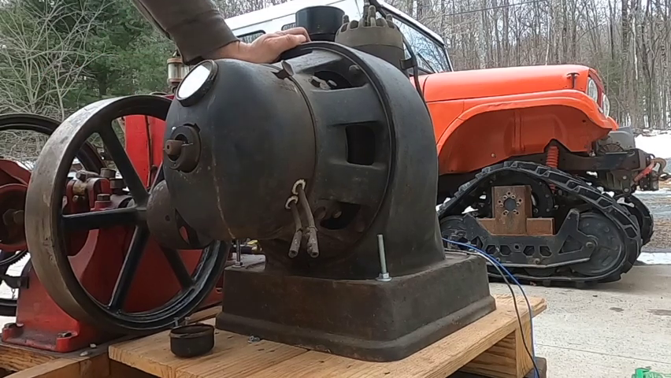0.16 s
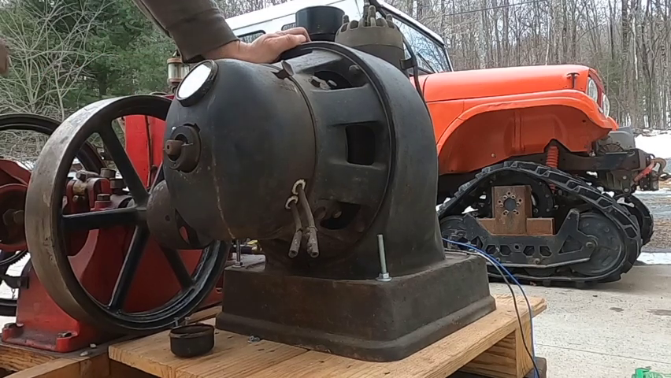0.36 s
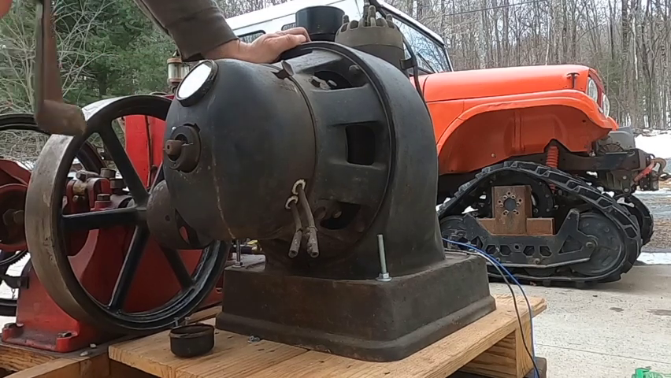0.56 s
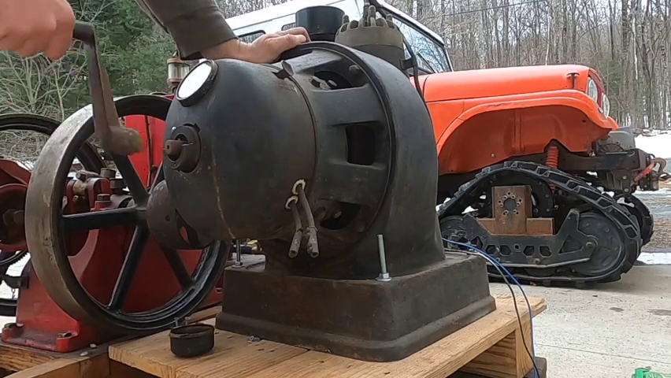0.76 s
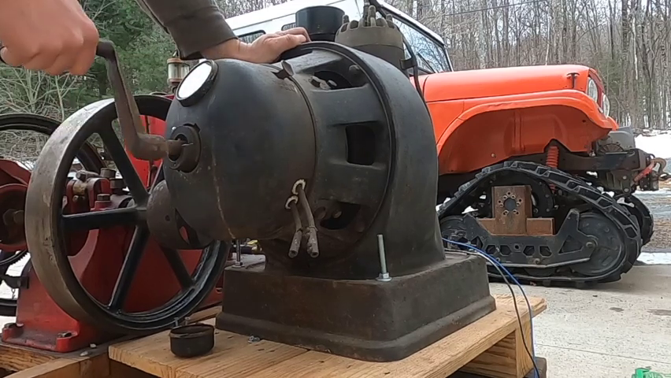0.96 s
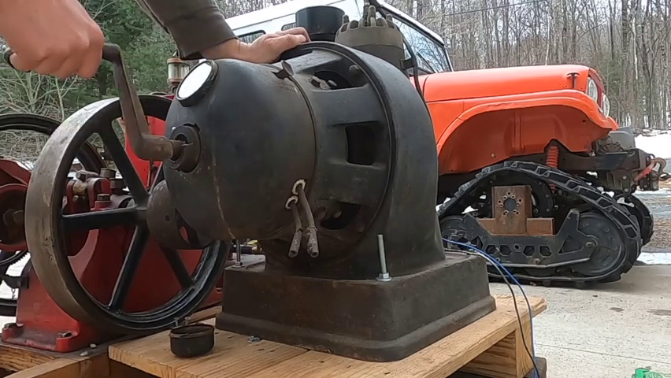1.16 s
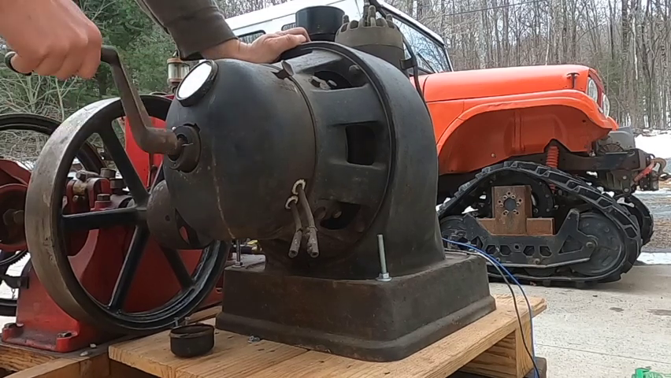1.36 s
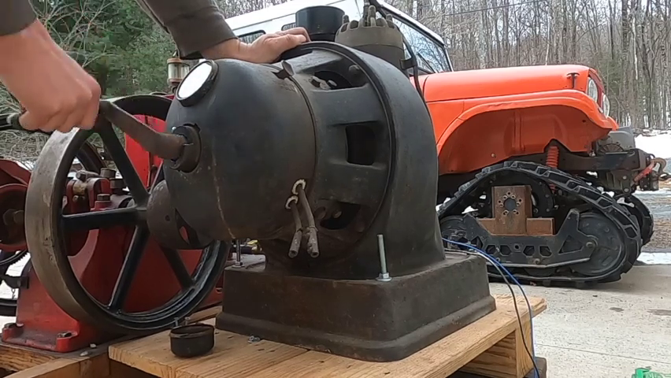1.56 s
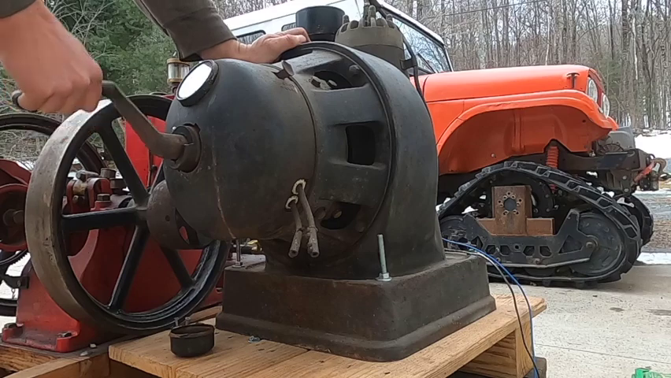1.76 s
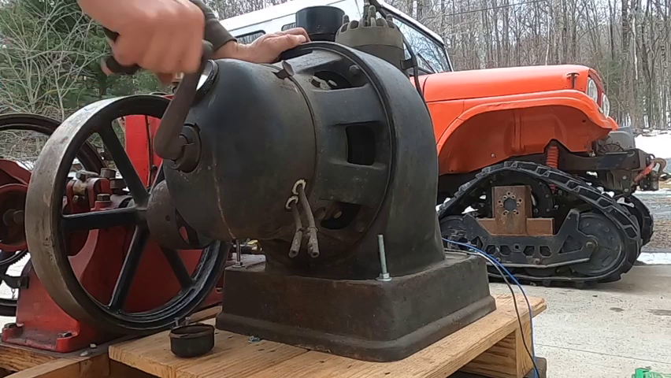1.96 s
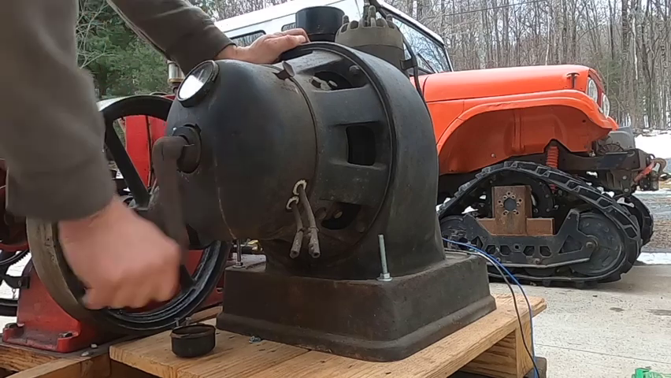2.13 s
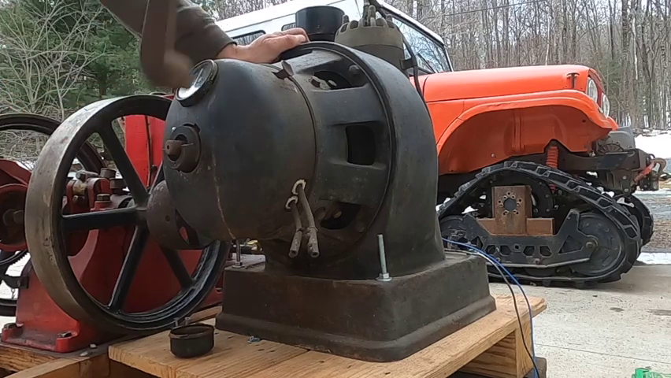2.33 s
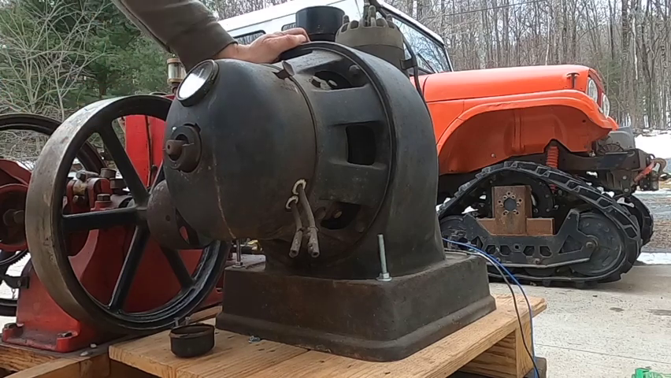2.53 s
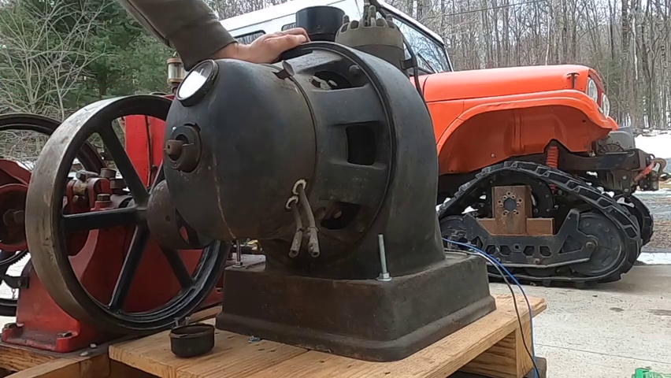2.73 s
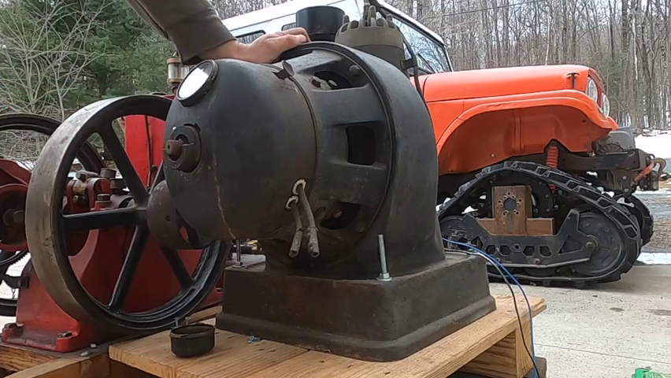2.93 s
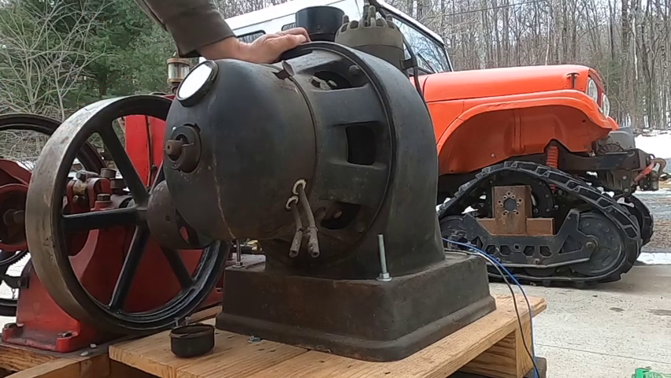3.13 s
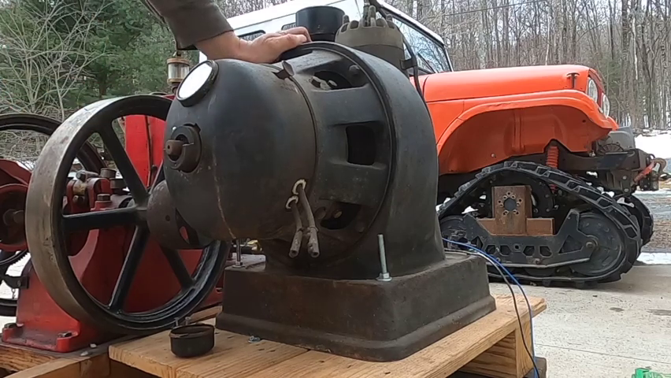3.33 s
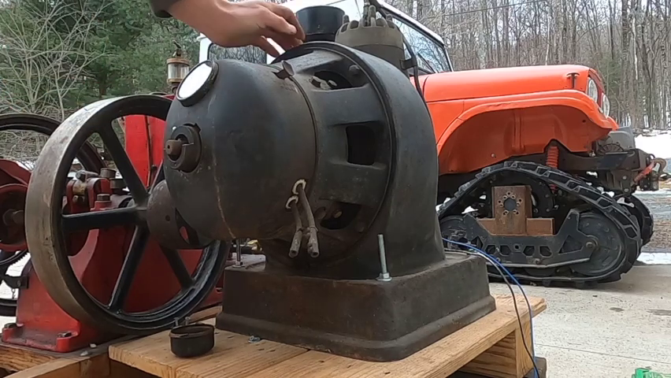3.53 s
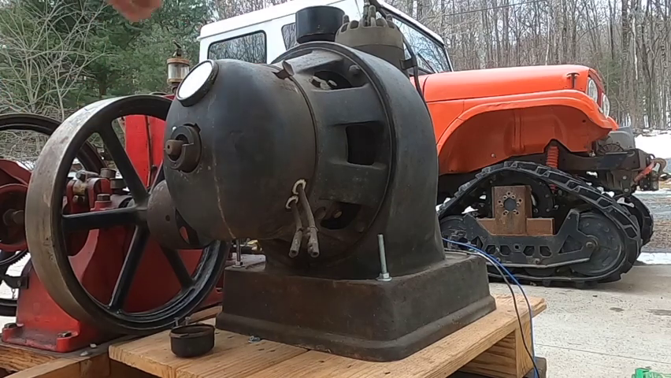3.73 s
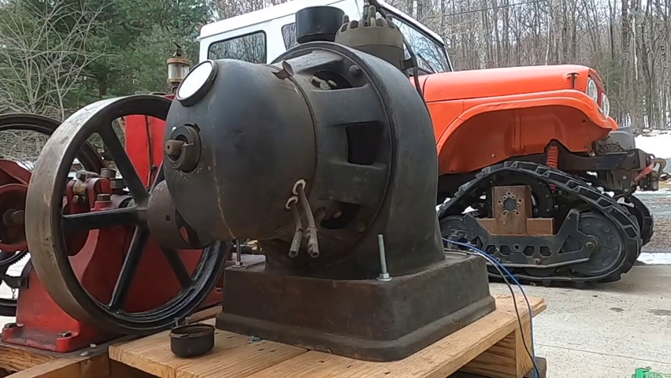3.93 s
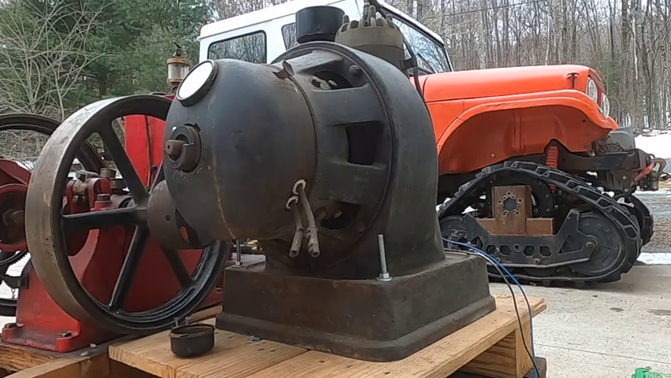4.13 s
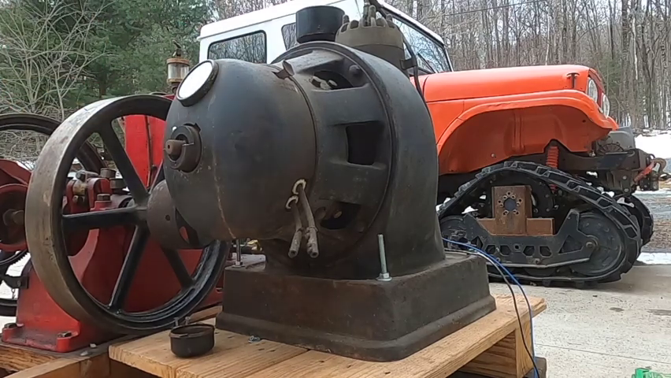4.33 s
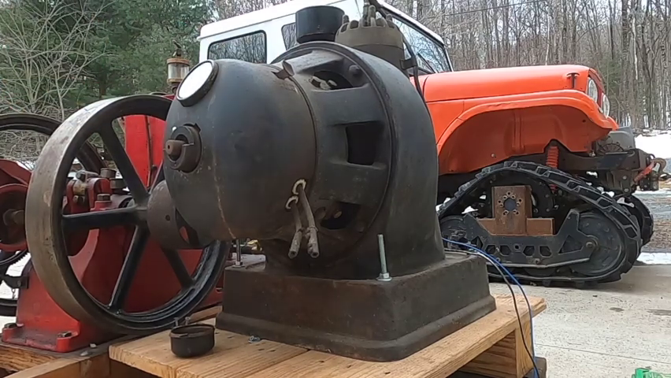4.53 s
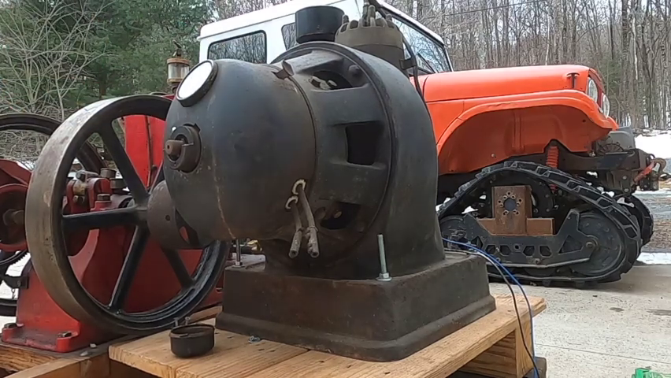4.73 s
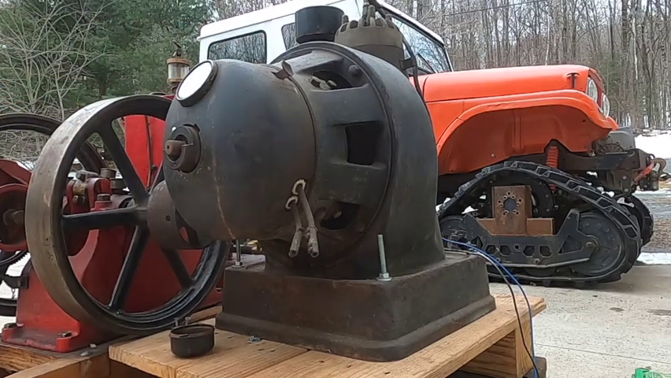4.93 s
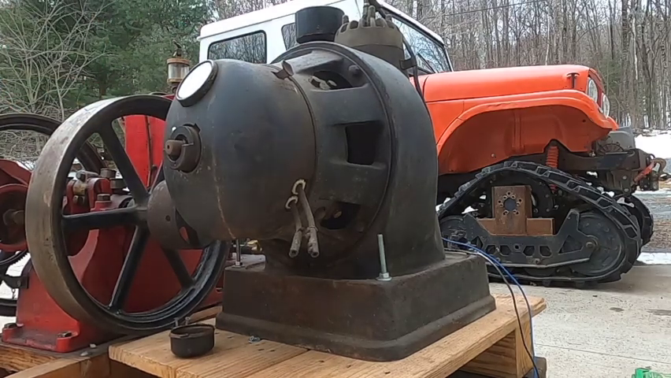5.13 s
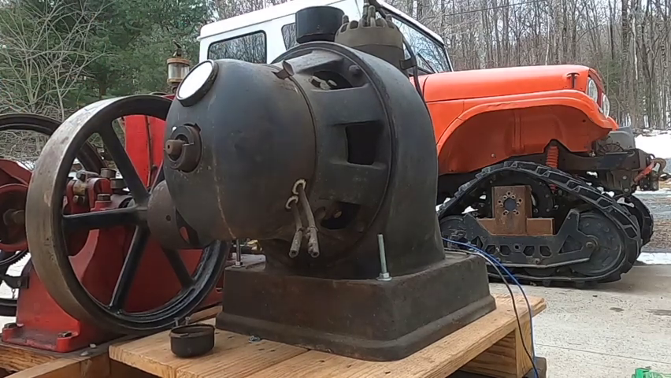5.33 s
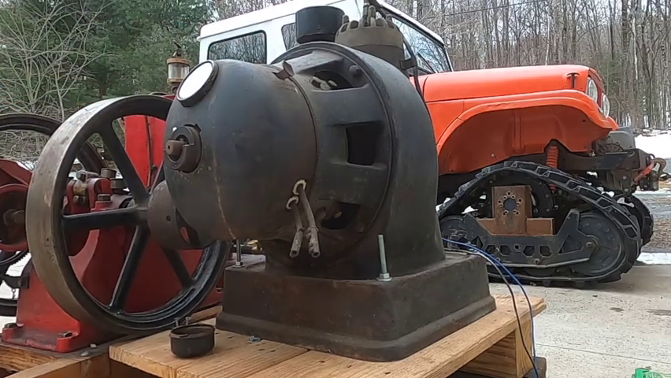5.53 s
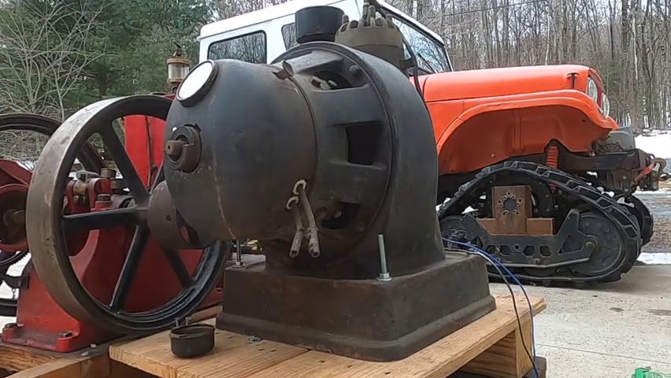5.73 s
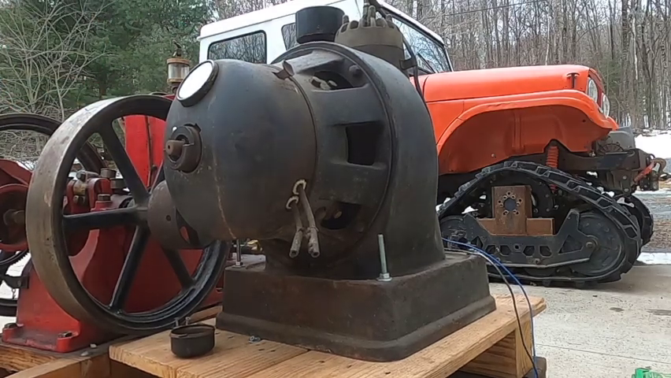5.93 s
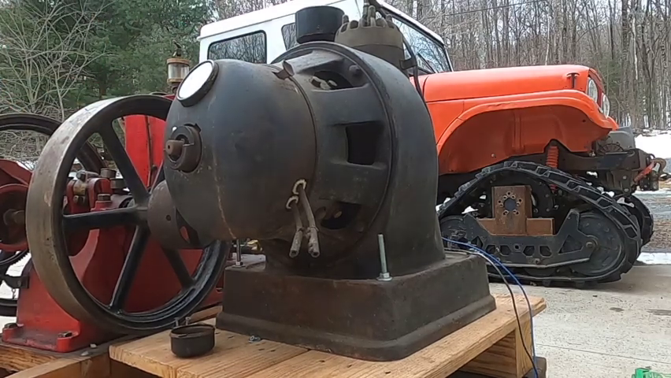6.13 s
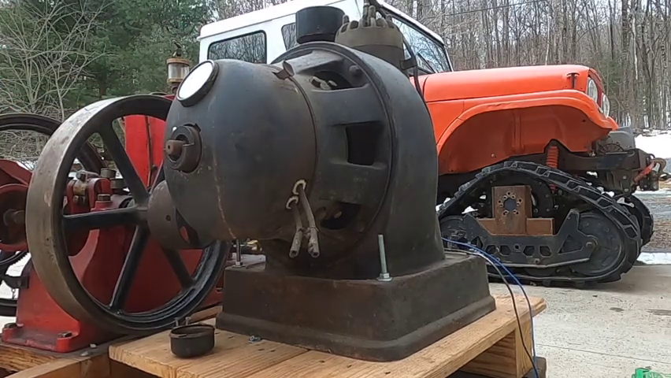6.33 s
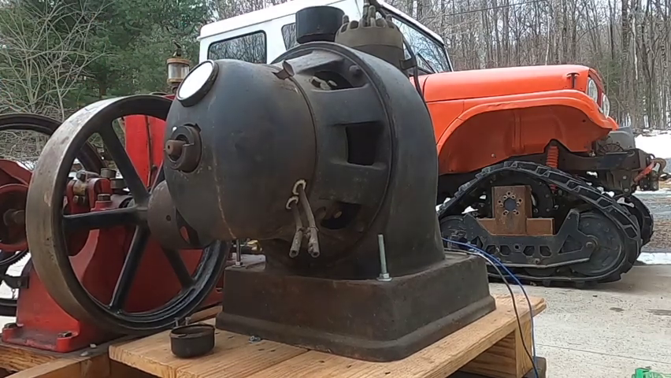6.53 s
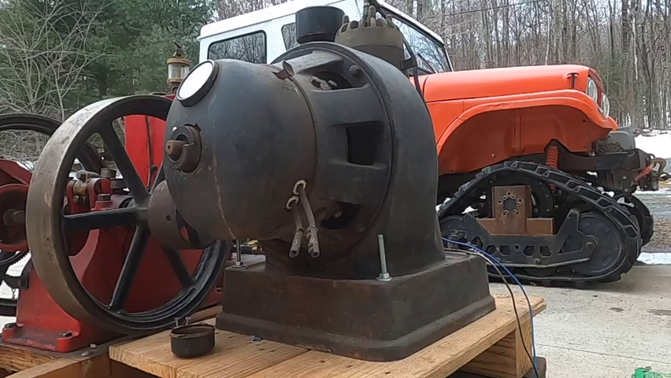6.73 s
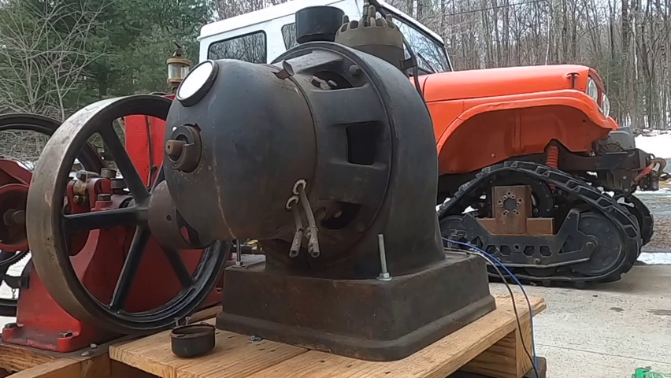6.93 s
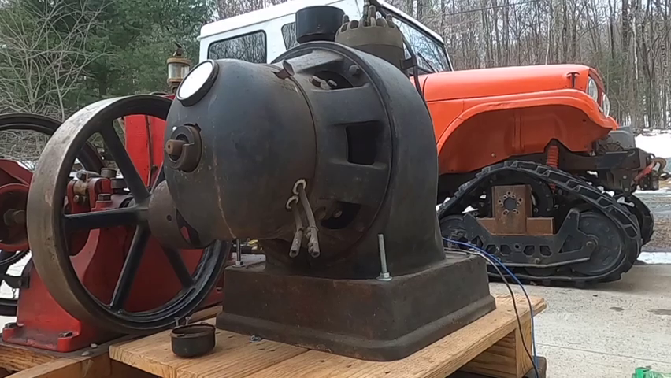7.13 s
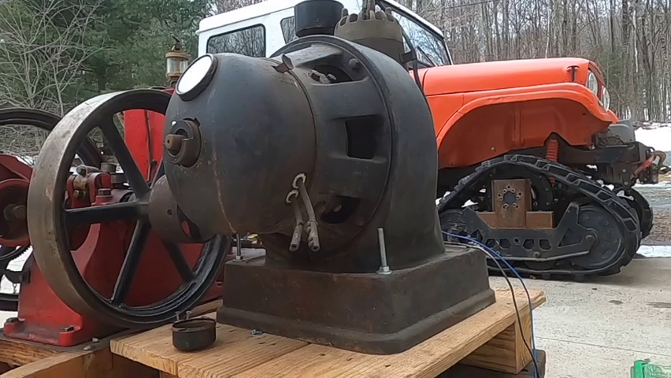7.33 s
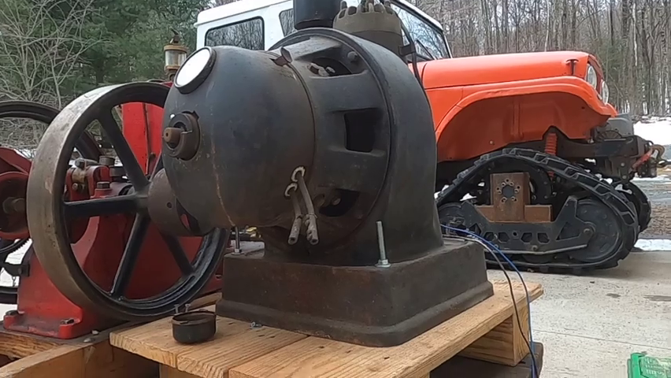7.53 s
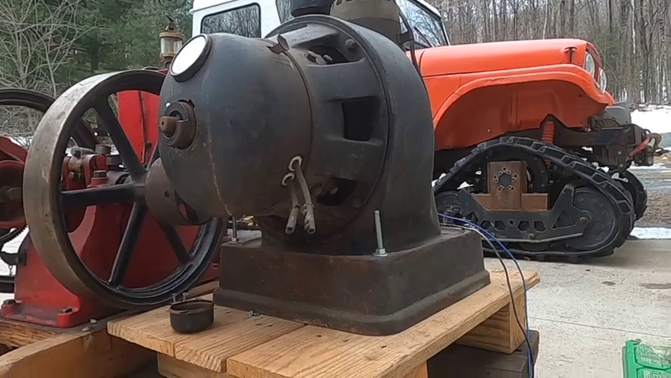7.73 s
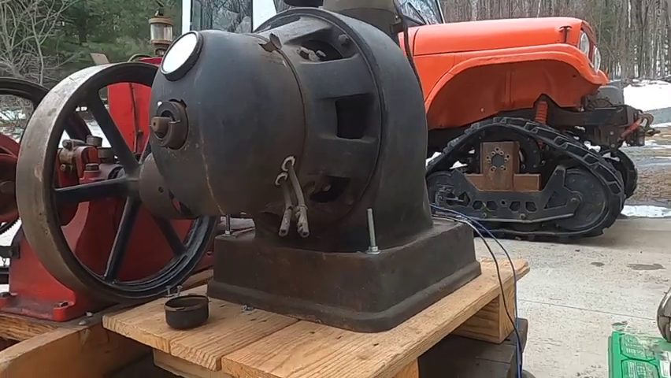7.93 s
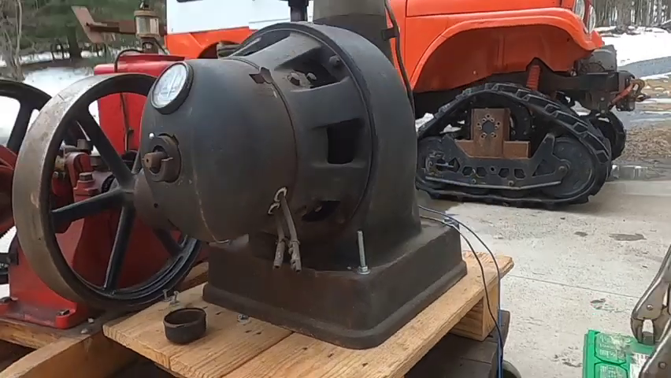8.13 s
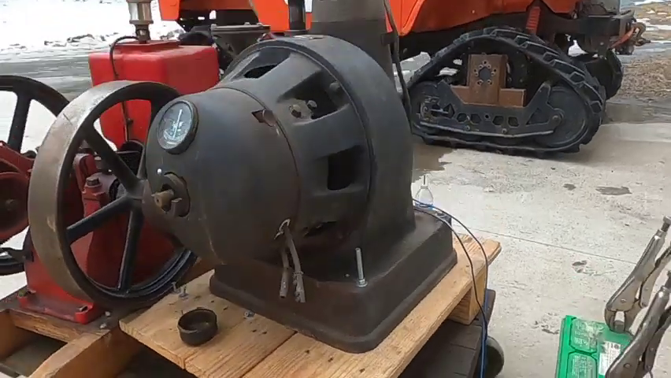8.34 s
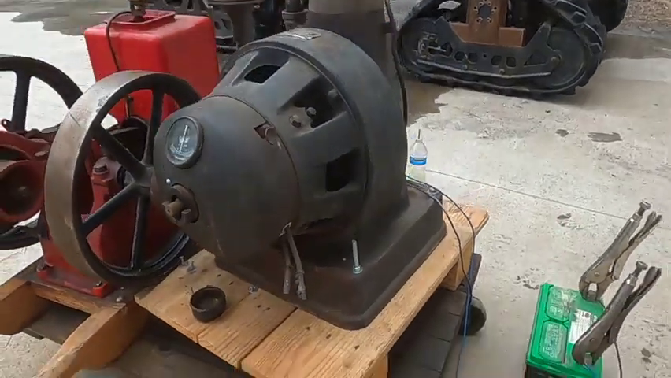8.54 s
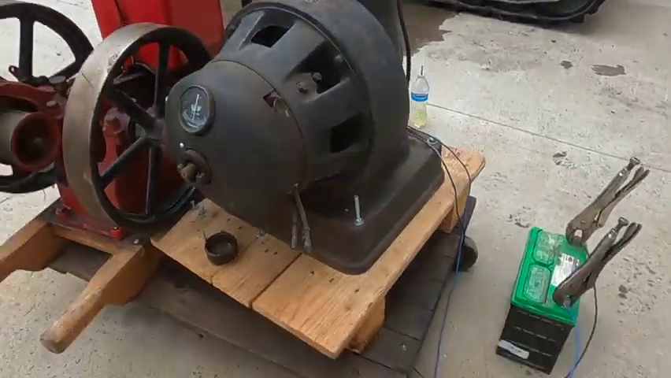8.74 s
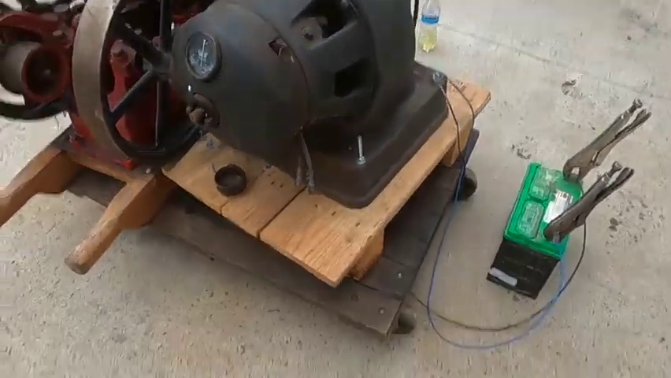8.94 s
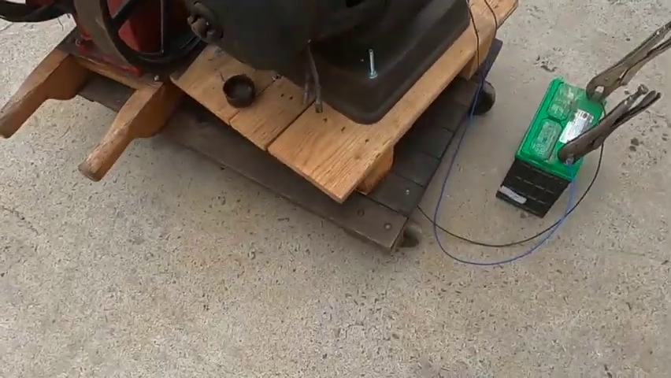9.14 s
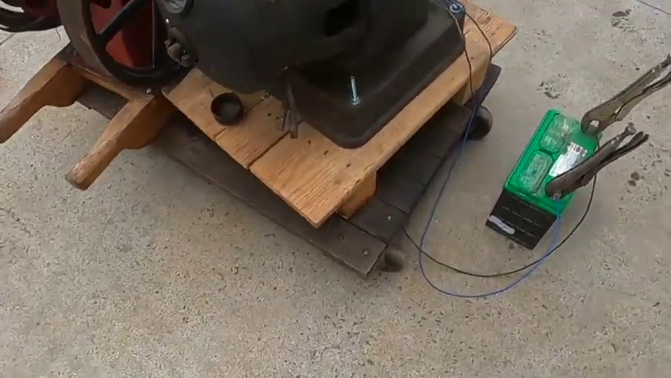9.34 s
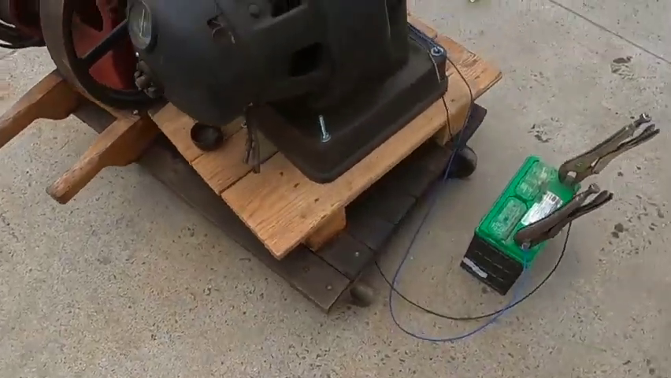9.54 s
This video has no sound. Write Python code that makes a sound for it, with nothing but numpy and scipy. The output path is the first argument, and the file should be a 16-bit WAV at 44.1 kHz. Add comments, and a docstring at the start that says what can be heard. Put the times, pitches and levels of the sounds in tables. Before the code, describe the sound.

Close by and outdoors, a small antique engine gives slow puffs and light knocks while a metal hand crank rattles into place. After one sharp clank, the exhaust starts to thump and crack, the beats coming ever quicker. Loose iron parts chatter as the engine runs up to a rapid, even beat, and right at the end it begins to fire only on every other turn.

```python
"""An old single-cylinder two-stroke generator engine, hand-cranked in a paved yard.
It rocks to a stop, the steel crank handle clanks back on, a swing makes it catch,
and it runs up until it fires only every other turn. Each turn brings a piston slap,
a crankcase gulp, a knock, an intake thump and the exhaust's thump and crack.
Blows ring damped modes; gas jets and rubbing are shaped noise."""
import sys
import numpy as np
from scipy import signal
from scipy.fft import rfft, irfft, next_fast_len
from scipy.io import wavfile
from scipy.ndimage import uniform_filter1d

SR = 44100
rng = np.random.default_rng(int(sys.argv[2]) if len(sys.argv) > 2 else 0)


def persist_wave(psi):
    """Save psi, clipped to +-1, as 16-bit WAV."""
    counts = np.round(np.clip(psi, -1, 1) * 32767).astype(np.int16)
    wavfile.write(sys.argv[1], SR, np.atleast_2d(counts).T)


N = 422478
TIME = np.arange(N) / SR
CAUGHT_S, SKIPPING_S = 3.5609, 9.14

# crank speed once caught: time_s, turns_per_s
SPEED = [(3.56, 6.573), (3.8, 6.655), (4.05, 7.772), (4.4, 9.641), (4.8, 12.32), (5.2, 15.356),
         (5.6, 18.685), (6.0, 21.579), (6.4, 24.098), (6.8, 26.034), (7.2, 27.816), (7.6, 29.43),
         (8.0, 30.59), (8.5, 31.567), (9.1, 32.633), (9.58, 32.605)]
# piston slap stroke: turns_before_exhaust, delay_s, level_db, db_per_speed_doubling, full_pull_db
SLAP_STROKE = (.52, 0, -31, -1.5, 1)
# piston rocking short of a full turn: start_s, slap_db
ROCKS = [(.562, -35), (.684, -44), (1.104, -39), (1.204, -42.5), (1.296, -43), (2.024, -41)]
# listener moving over the engine: time_s, left_lag_samples, crack_db, thump_db, shell_db
LISTENER = [(7.1, 1, 0, 0, -35), (7.7, 1, 0, 0, -16), (8.6, .2, 1.5, -3, -1)]
# rubbing and casting spectra: freq_hz, density_db
HISS_COLOUR = [(700, -42), (1400, 0), (2500, 0), (3300, -5), (4400, -7.5), (6000, -13.5), (8200, -14.5),
               (10000, -25), (14000, -35), (16000, -41)]
CASTING_COLOUR = [(100, -4), (250, 8), (600, 10.5), (900, 8.5), (1500, -7.5), (2600, -9.5), (5000, -17.5),
                  (9000, -48.5)]


def from_db(db):
    """Decibels to gain."""
    return 10 ** (np.asarray(db) / 20)


def at_time(rows, time_s):
    """Each value column of a curve at the given times."""
    knots_s, *columns = np.transpose(rows)
    return [np.interp(time_s, knots_s, c) for c in columns]


def noise(colour, size):
    """Unit-rms stereo noise, alike in both ears in the bass."""
    # left-right likeness: freq_hz, correlation
    likeness = [(100, 1), (1500, 1), (2500, .97), (5000, .78), (14000, .65)]
    log_hz = np.log(np.arange(size // 2 + 1) * SR / size + 1)
    curves = np.transpose(colour), np.transpose(likeness)
    level_db, alike = (np.interp(log_hz, np.log(hz), values) for hz, values in curves)
    mid, side = rfft(rng.standard_normal((2, size))) * from_db(level_db)
    x = irfft(np.sqrt(1 + alike) * mid + np.sqrt(1 - alike) * side * [[1], [-1]], size)
    return x / x.std()


def long_noise(colour):
    """Scene-length coloured noise."""
    return noise(colour, next_fast_len(N, True))[:, :N]


def grain(samples):
    """Unit-rms random flutter."""
    x = uniform_filter1d(rng.standard_normal(N), samples)
    return x / x.std()


def clicks(events, spread_db):
    """One impulse per event row: start_s, level_db."""
    start_s, level_db = np.transpose(events)
    gains = from_db(level_db + spread_db * rng.standard_normal(len(start_s)))
    return np.bincount(np.clip(start_s * SR, 0, N).astype(int), gains, N + 1)[:N] + 1e-18


def ring(events, modes, soft_hz, spread_db=0, swoop_cycles=0, alternate=False):
    """Blows ring modes; late low modes swoop down, alternating signs soften the onset."""
    start_s, blow_db = np.transpose(events)
    doublings, out = effort(start_s)[0], 0
    for k, (hz, level_db, t60_s, rise_db) in enumerate(modes):
        sign = -1 if alternate and k % 2 else 1
        r, w = from_db(-60 / (t60_s * SR)), 2 * np.pi * hz / SR
        late_s = swoop_cycles * (1 / hz - 1 / modes[-1][0])
        blows = clicks(np.c_[start_s + late_s, blow_db + level_db + rise_db * doublings], spread_db)
        out = out + sign * signal.lfilter([0, np.sin(w)], [1, -2 * r * np.cos(w), r * r], blows)
    return signal.sosfilt(signal.butter(2, soft_hz, fs=SR, output="sos"), out)


def bursts(events, rise_s, fall_s, spread_db=0):
    """Envelope that swells and dies at each event."""
    t = TIME[:SR // 4]
    shape = (1 - np.exp(-t / rise_s)) ** 2 * np.exp(-t / fall_s)
    return signal.oaconvolve(clicks(events, spread_db), shape / shape.max())[:N]


def bouncing(events, gap_s, loss_db, count=3):
    """Each event as a run of weakening strikes at uneven gaps."""
    gaps_s = gap_s * rng.uniform(.4, 1.6, (len(events), count))
    start_s = events[:, :1] + np.cumsum(gaps_s, axis=1) - gaps_s[:, :1]
    return np.c_[start_s.ravel(), (events[:, 1:] - loss_db * np.arange(count)).ravel()]


def radiate(x, low_hz):
    """Small openings and panels radiate little deep bass."""
    return signal.sosfilt(signal.butter(1, low_hz, "high", fs=SR, output="sos"), x)


def crank_turns():
    """Turns since the engine caught."""
    turns = np.cumsum(at_time(SPEED, TIME)[0]) / SR
    return turns - np.interp(CAUGHT_S, TIME, turns)


def effort(time_s):
    """Speed doublings since catching, and pull (share of full acceleration)."""
    window_s, full_turns_per_s2 = .4, 8
    before, now, after = (at_time(SPEED, time_s + d)[0] for d in (-window_s / 2, 0, window_s / 2))
    return np.log2(now / SPEED[0][1]), np.clip((after - before) / window_s / full_turns_per_s2, 0, 1)


def strokes(stroke):
    """One event per running turn; strength follows speed and pull."""
    lead_turn, delay_s, level_db, speed_db, pull_db = stroke
    turns = crank_turns()
    start_s = np.interp(np.arange(turns[-1] + lead_turn) - lead_turn, turns, TIME) + delay_s
    doublings, pull = effort(start_s)
    return np.c_[start_s, level_db + speed_db * doublings + pull_db * pull]


def slow_strokes(stroke, column):
    """One event per cranked turn; a slow crank lingers at dead centre, then hurries."""
    # cranked turns: dead_centre_s, port_opens_s, slap_db, gulp_db, intake_db, thump_db, crack_db
    slow_turns = [(-.095, .078, -60, -60, -16, -17.5, -26), (.208, .408, -30.5, -18, -19, -14, -28.5),
                  (.695, .895, -55, -50, -32, -16, -30), (2.1, 2.254, -55, -50, -17, -13.5, -22),
                  (2.352, 2.47, -35, -14, -9, -10, -13), (2.545, 2.662, -25.5, -10.5, -12, -16.5, -23),
                  (2.755, 2.854, -36, -14, -11, -10.5, -10), (2.935, 3.034, -25.5, -16, -14, -20.5, -26),
                  (3.133, 3.219, -36, -13.5, -10, -12.5, -13), (3.29, 3.395, -26.5, -14, -12, -19, -24)]
    columns = np.transpose(slow_turns)
    centre_s, port_s = columns[:2]
    share = (stroke[0] / SLAP_STROKE[0]) ** 1.6
    return np.c_[port_s - share * (port_s - centre_s) + (1 - share) * stroke[1], columns[column]]


def skip_firings(events, loss_db, boost_db):
    """At full speed every other turn fails to fire; the rest fire harder."""
    change_db = np.where(np.arange(len(events)) % 2 == 1, loss_db, boost_db)
    return events + np.outer((events[:, 0] > SKIPPING_S) * change_db, [0, 1])


def yard(x, wet_db, t60_s, onset_s):
    """Machines, paving and trees scatter a short tail."""
    # tail spectrum: freq_hz, density_db
    colour = [(40, -16), (200, 11.5), (1000, -5), (4000, -7), (9000, -8), (16000, -4.5)]
    t = TIME[:SR // 2]
    tail = noise(colour, len(t)) * from_db(-60 * t / t60_s) * (1 - np.exp(-(t / onset_s) ** 2))
    tail /= np.sqrt(np.sum(tail ** 2) / 2)
    return x + from_db(wet_db) * signal.oaconvolve(x, tail, axes=1)[:, :N]


def friction(swell_db, grain_db, shake_db):
    """Rubbing and air grow with speed and swell once a turn; the unbalanced crank shakes the frame."""
    # rubbing while cranking: time_s, level_db
    rubbing = [(0.0, -60), (0.44, -62), (0.7, -75), (.88, -63), (1.25, -77), (1.49, -57), (1.72, -77),
               (1.97, -70), (2.45, -48), (2.98, -58), (3.5, -56)]
    # rumble spectrum: freq_hz, density_db
    rumble_colour = [(30, 4), (90, 5), (250, 7.5), (450, 1.5), (700, -4), (1050, -3.5), (1600, -18.5),
                     (3000, -45.5)]
    rubbing_db, doublings = at_time(rubbing, TIME)[0], effort(TIME)[0]
    angle, running = 2 * np.pi * crank_turns(), TIME > CAUGHT_S
    swell = from_db(swell_db * running * np.cos(angle + 2 * np.pi * .053))
    hiss_db = rubbing_db + 1.5 + 8.2 * doublings + grain_db * running * grain(samples=180)
    hiss = from_db(hiss_db) * long_noise(HISS_COLOUR)
    rumble = from_db(rubbing_db + 14 + 5.8 * doublings) * long_noise(rumble_colour)
    frame = from_db(shake_db) * running * (at_time(SPEED, TIME)[0] / SPEED[-1][1]) ** 2 * np.cos(angle)
    return swell * (hiss + rumble) + frame


def crank_handle(ring_db, scrape_db, casting_db, shaft_db):
    """Steel meets the shaft: handle, socket and shaft ring, the contact scrapes, the casting thuds."""
    # handle hits: start_s, handle_db, socket_db, scrape_db, shaft_and_casting_db
    clanks = [(1.097, -26, -36, -37, -27.5), (1.323, -34, -26, -25, -35), (1.337, -33, -22, -28, -48),
              (1.475, -39, -36, -34, -32.5), (1.491, -28, -31, -29, -43), (1.501, -27, -30, -30, -41),
              (1.515, -36, -26, -12, -18), (2.346, -12, -30, -25, -26)]
    # steel modes: pitch_hz, level_db, t60_s, db_per_speed_doubling
    handle_modes = [(1035, -2, .1, 0), (1346, 3, .075, 0), (1415, 0, .09, 0), (3018, -1.5, .16, 0),
                    (7639, -17, .16, 0), (8565, -15, .14, 0)]
    socket_modes = [(1367, -6, .1, 0), (1900, -5, .1, 0), (2083, -3, .11, 0), (2557, -3, .13, 0),
                    (3060, 2, .08, 0), (3540, -2, .06, 0), (4538, -8, .12, 0), (7590, -8, .13, 0),
                    (9100, -22, .17, 0)]
    shaft_modes = [(587, -4, .2, 0), (807, -5, .2, 0), (1750, -6, .14, 0), (2213, 0, .11, 0),
                   (3849, -10, .12, 0)]
    # handle rubbing on the spinning shaft until drawn off: time_s, level_db
    spinning = [(1.9, -80), (2.2, -58), (2.5, -57), (2.68, -52), (2.8, -75)]
    # its spectrum: freq_hz, density_db
    spin_colour = [(1500, -20), (3000, -4), (4200, 0), (7500, -5), (10000, -19), (13000, -17), (16000, -35)]
    handle_hits, socket_hits, contacts, shaft_hits = (np.array(clanks)[:, [0, k]] for k in (1, 2, 3, 4))
    steel = ring(handle_hits, handle_modes, soft_hz=12000, spread_db=1, swoop_cycles=2.3)
    steel += ring(socket_hits, socket_modes, soft_hz=12000, spread_db=1, swoop_cycles=2)
    shaft = ring(shaft_hits, shaft_modes, soft_hz=9000, spread_db=1, swoop_cycles=2)
    skids = bouncing(contacts, gap_s=.007, loss_db=6)
    scrape = bursts(skids, rise_s=.00018, fall_s=.007, spread_db=1.2) * long_noise(HISS_COLOUR)
    casting = bursts(shaft_hits, rise_s=.00033, fall_s=.022, spread_db=.6) * long_noise(CASTING_COLOUR)
    spin = from_db(at_time(spinning, TIME)[0] + 3 * grain(samples=60)) * long_noise(spin_colour)
    ringing = from_db(ring_db) * steel + from_db(shaft_db) * shaft
    return ringing + from_db(scrape_db) * scrape + from_db(casting_db) * casting + spin


def knocking(slap_db, knock_db, loose_db, grit_db):
    """Play in piston and bearings knocks on the iron; loose parts join in."""
    # iron modes: pitch_hz, level_db, t60_s, db_per_speed_doubling
    slap_modes = [(573, 7, .045, 0), (676, 5.5, .02, 0), (870, -2, .04, 0), (1062, 1, .06, 0)]
    knock_modes = [(346, -3, 0.069, 0), (400.2, 6, 0.14, 0), (451, -3, 0.082, 0.24), (544, 2, 0.073, 0),
                   (615, -0.5, 0.07, 0), (807, -4, 0.063, 1.4)]
    loose_modes = [(735, -4, .04, 0), (950, -4, .036, 0), (1070, 0, .045, 0), (1172, -4, .06, 0),
                   (1385, -3.5, .041, 0)]
    # strokes: turns_before_exhaust, delay_s, level_db, db_per_speed_doubling, full_pull_db
    knock_stroke = (.39, 0, -21.3, -2.6, 2.5)
    chatter_stroke = (.29, 0, -31, 4.6, 2.5)
    slaps = np.r_[ROCKS, slow_strokes(SLAP_STROKE, column=2), strokes(SLAP_STROKE)]
    knocks = np.r_[slow_strokes(knock_stroke, column=4) - [0, 8.5], strokes(knock_stroke)]
    # a loose part bounces as the engine passes its resonance
    rattles = np.c_[4.853 + .069 * np.arange(9), np.full(9, -17)]
    jolts = np.r_[strokes(chatter_stroke), knocks - [0, 11], slaps - [0, 7]]
    shaken = bouncing(jolts, gap_s=.005, loss_db=3.5)
    slap = ring(slaps, slap_modes, soft_hz=1850, spread_db=1, swoop_cycles=4.95)
    knock = ring(knocks, knock_modes, soft_hz=1080, spread_db=.5, swoop_cycles=5.5)
    loose = ring(np.r_[rattles, shaken], loose_modes, soft_hz=3000, spread_db=1.2, swoop_cycles=4.24)
    grit = bursts(np.r_[slaps, rattles, knocks - [0, 7]], rise_s=.00077, fall_s=.012, spread_db=.5)
    iron = from_db(slap_db) * slap + from_db(knock_db) * knock + from_db(loose_db) * loose
    return radiate(iron, low_hz=200) + from_db(grit_db) * grit * long_noise(CASTING_COLOUR)


def breathing_ports():
    """The crankcase gulps, then the intake opens: soft, hollow thumps of suction."""
    # cavity modes: pitch_hz, level_db, t60_s, db_per_speed_doubling
    gulp_modes = [(114, 3, .018, -2.6), (148, 1, .068, -.5), (350, -11, .056, -1), (560, -8, .09, -6)]
    intake_modes = [(124.1, 4.5, .066, -2), (220, 1, .069, -4.5), (262, -6, .055, -2.5)]
    # strokes: turns_before_exhaust, delay_s, level_db, db_per_speed_doubling, full_pull_db
    gulp_stroke = (.48, .0049, -14, -2, -1)
    intake_stroke = (.293, .0069, -12.5, -.9, 1)
    rocking = np.array(ROCKS) + [.028, 9]   # a gulp follows each slap
    gulps = np.r_[rocking, slow_strokes(gulp_stroke, column=3), strokes(gulp_stroke)]
    intakes = np.r_[slow_strokes(intake_stroke, column=4), strokes(intake_stroke)]
    gulp = ring(gulps, gulp_modes, soft_hz=460, spread_db=.7)
    return radiate(gulp - ring(intakes, intake_modes, soft_hz=390), low_hz=115)


def drone(lead_turn):
    """Gas pulsation hums under pull; its harmonics glide up through the silencer's resonances."""
    # pulsation: speed_multiple, level_db
    harmonics = [(5, -29), (6, -28), (8, -22), (11, -24)]
    # silencer resonances: centre_hz, half_width_hz, gain_db
    resonances = [(135, 32, 0), (228, 26, -2.5)]
    speed_hz, angle, out = at_time(SPEED, TIME)[0], 2 * np.pi * (crank_turns() + lead_turn), 0
    for multiple, level_db in harmonics:
        pitch_hz = multiple * speed_hz
        lift = sum(from_db(db) / (1 + ((pitch_hz - hz) / half_hz) ** 4) for hz, half_hz, db in resonances)
        out = out + from_db(level_db) * lift * np.cos(multiple * angle)
    return out * effort(TIME)[1] ** 2


def pipe_note(width_hz):
    """Rushing gas keeps one narrow pipe resonance singing."""
    # note climbing as the pipe warms: time_s, pitch_hz
    warming = [(3.2, 3780), (5.0, 4430)]
    waver = signal.sosfilt(signal.butter(2, width_hz, fs=SR, output="sos"), rng.standard_normal(N))
    return waver / waver.std() * np.cos(2 * np.pi * np.cumsum(at_time(warming, TIME)[0]) / SR)


def exhaust_thump():
    """The opening port thumps the silencer; its shell is heard from above."""
    # silencer modes: pitch_hz, level_db, t60_s, db_per_speed_doubling
    silencer_modes = [(125.7, 5.5, .081, -1.8), (140.6, -5, .12, 4.5), (216.6, -8.5, .068, 3),
                      (263.3, -13, .057, 3), (481.5, -15, .04, 3)]
    shell_modes = [(192, -5, .13, 0), (250, -9, .08, 0)]
    # stroke: turns_before_exhaust, delay_s, level_db, db_per_speed_doubling, full_pull_db
    thump_stroke = (.009, .00055, -12, -2.1, .8)
    thumps = skip_firings(strokes(thump_stroke), loss_db=-10, boost_db=2.5)
    pushes = slow_strokes(thump_stroke, column=5)
    swings = np.r_[pushes - [0, 3], pushes + [.0083, -5]]   # a long push drives a second swing
    thump_db, shell_db = at_time(LISTENER, TIME)[2:]
    cranked = ring(swings, silencer_modes, soft_hz=450)
    running = from_db(thump_db) * ring(thumps, silencer_modes, soft_hz=1750)
    shell = from_db(shell_db) * ring(thumps, shell_modes, soft_hz=1750)
    return radiate(cranked + running, low_hz=50) + shell


def exhaust_gas(tail_db, sigh_db, note_db):
    """Fired gas rings the pipe, pops at its mouth and cracks out; unfired puffs sigh."""
    # pipe and mouth modes: pitch_hz, level_db, t60_s, db_per_speed_doubling
    blowdown_modes = [(178, -15.5, .06, 4), (340, -9, .015, 1.5)]
    pop_modes = [(600, 3.5, .009, 1.6), (940, 1.5, .012, 2.2)]
    # jet and tail spectra: freq_hz, density_db
    jet_colour = [(300, -3), (900, 3), (1600, -2), (3000, 2.5), (4500, 2), (6500, -1), (8300, 1.5),
                  (9300, -12), (11000, -23), (14000, -21), (16000, -57)]
    tail_colour = [(800, 7), (2200, 0.5), (3100, -4.5), (3800, 8), (4500, 1), (6000, -4), (8200, -9.5),
                   (10000, -23), (16000, -41.5)]
    # stroke: turns_before_exhaust, delay_s, level_db, db_per_speed_doubling, full_pull_db
    crack_stroke = (.009, -.0003, -19.4, .7, 2.2)
    # piston swaying across the port: start_s, level_db
    stray_puffs = [(.4064, -31), (.5437, -40)]
    full_bang_db, lag_s_per_db = -11, .0007   # weaker puffs leave later
    cracks = skip_firings(strokes(crack_stroke), loss_db=-27, boost_db=3)
    puffs = slow_strokes(crack_stroke, column=6)
    puffs[:, 0] += lag_s_per_db * np.maximum(full_bang_db - puffs[:, 1], 0)
    puffs = np.r_[puffs, stray_puffs]
    fired = puffs[:, 1] > -17
    bangs, gas = np.r_[puffs[fired] - [0, 7], cracks], np.r_[puffs + [0, 2.5], cracks]
    blowdown = ring(bangs, blowdown_modes, soft_hz=3000)
    pop = ring(bangs, pop_modes, soft_hz=2500, alternate=True)
    fast = at_time(SPEED, cracks[:, 0])[0] > 11   # a slow piston uncovers the port more gradually
    crack_db = at_time(LISTENER, TIME)[1] - .3
    jet = from_db(crack_db) * bursts(cracks[fast], rise_s=.00031, fall_s=.0024, spread_db=1.2)
    jet += bursts(np.r_[puffs[fired] - [0, 8], cracks[~fast] + [0, 1.5]], rise_s=.00049, fall_s=.0049)
    tail = from_db(tail_db) * bursts(gas, rise_s=.0025, fall_s=.018, spread_db=1)
    sighs = bouncing(puffs[~fired] - [.012, 5], gap_s=.008, loss_db=1)
    tail += from_db(sigh_db) * bursts(sighs, rise_s=.005, fall_s=.005)
    note = from_db(note_db) * bursts(gas, rise_s=.003, fall_s=.02, spread_db=1) * pipe_note(width_hz=220)
    return jet * long_noise(jet_colour) + tail * long_noise(tail_colour) + note - blowdown - pop


def scene():
    """The engine stands slightly right until the listener moves over it."""
    engine = exhaust_thump() + exhaust_gas(tail_db=-20, sigh_db=-11, note_db=-21.5)
    engine += drone(lead_turn=.14) + breathing_ports()
    engine += knocking(slap_db=-4.5, knock_db=-4.5, loose_db=-5, grit_db=-5.5)
    handle = crank_handle(ring_db=-6.5, scrape_db=-4, casting_db=-2.5, shaft_db=-6)
    rush = friction(swell_db=3.5, grain_db=2.5, shake_db=-27)
    left, right = yard(engine + handle, wet_db=-14.5, t60_s=.29, onset_s=.0043) + rush
    lag_samples = at_time(LISTENER, TIME)[0]
    delayed = np.r_[0, left[:-1]]
    return np.array([left + lag_samples * (delayed - left), right])


def record(dry):
    """Soft clip, then low-pass."""
    ceiling, cutoff_hz = .65, 16000
    rounded = ceiling * np.tanh(dry / ceiling)
    return signal.sosfilt(signal.ellip(10, .1, 80, cutoff_hz, fs=SR, output="sos"), rounded)


dry = scene()
out = record(dry)
persist_wave(out)
```